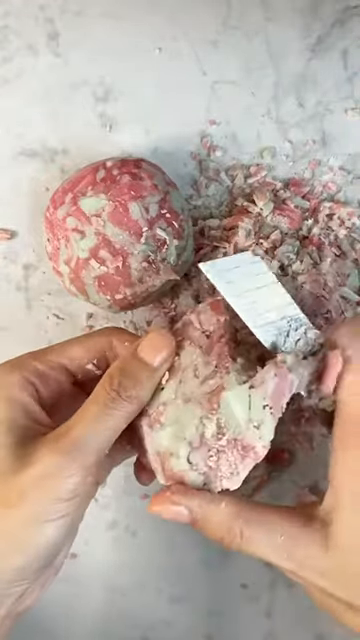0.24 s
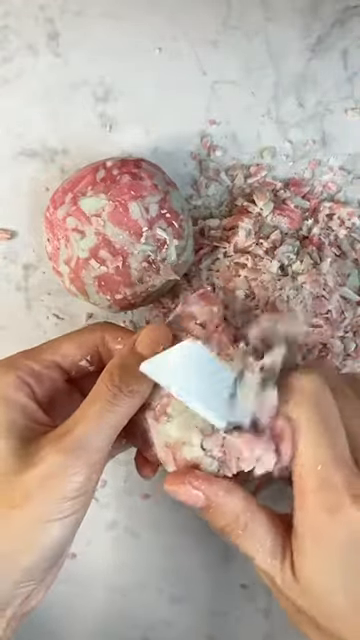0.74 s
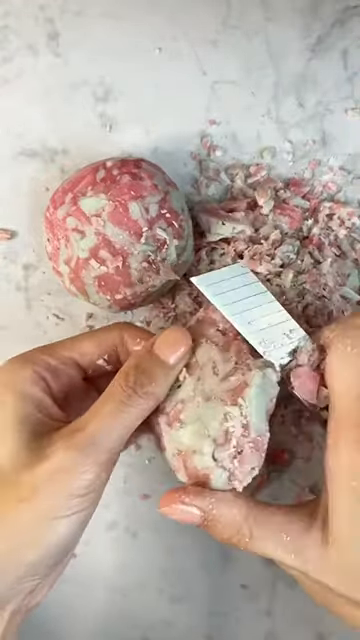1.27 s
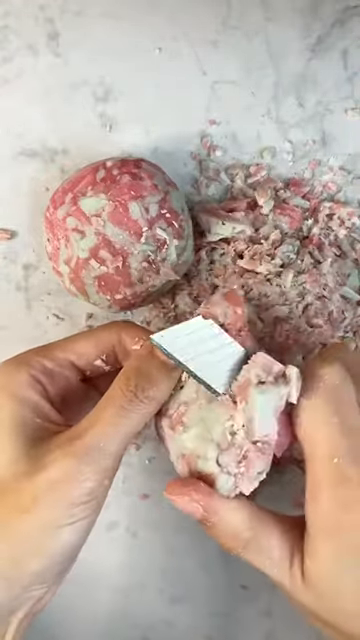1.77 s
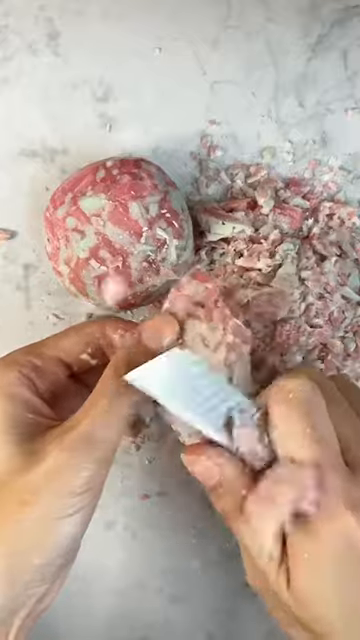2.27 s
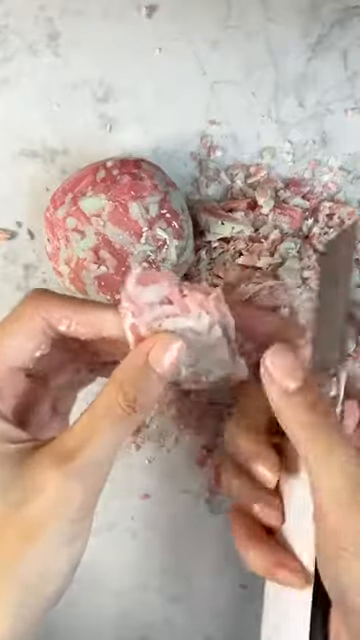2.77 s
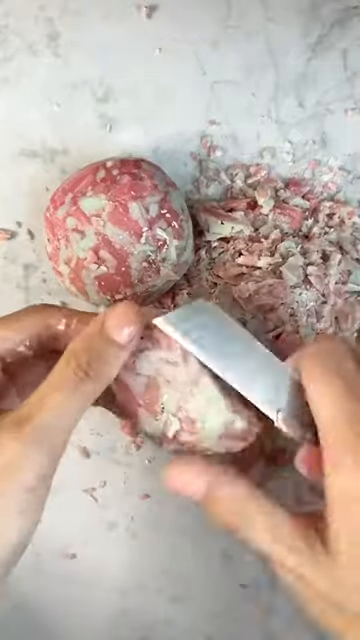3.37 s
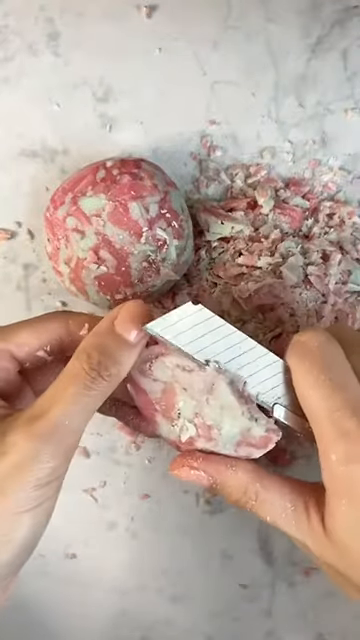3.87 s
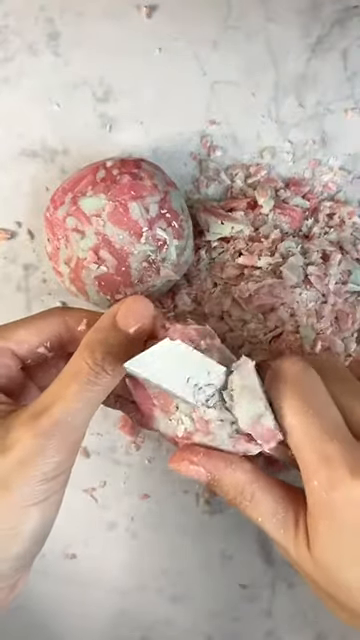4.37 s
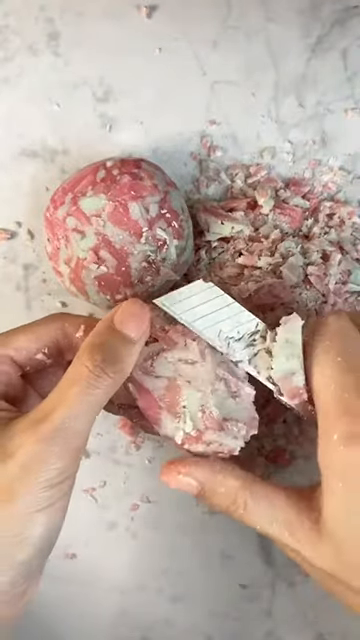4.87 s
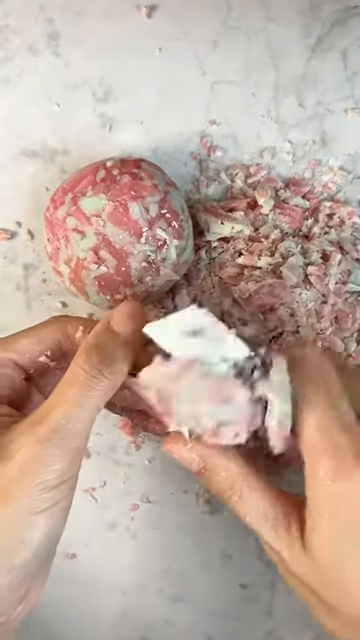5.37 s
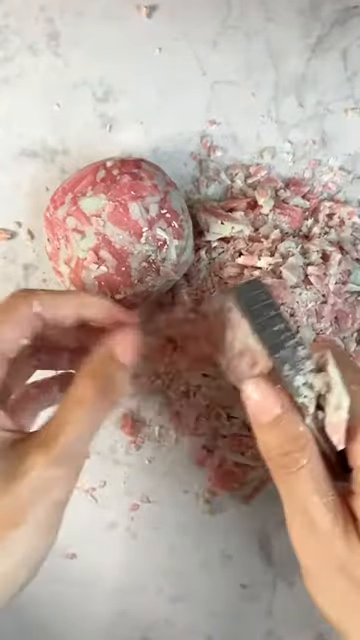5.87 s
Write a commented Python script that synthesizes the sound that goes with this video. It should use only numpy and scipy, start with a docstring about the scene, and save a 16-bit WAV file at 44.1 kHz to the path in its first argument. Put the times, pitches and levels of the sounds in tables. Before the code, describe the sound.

Brittle snaps and dry crunches come in uneven clusters as a blade cuts into hard soap, heard up close in a quiet room. Loosened pieces land on a table top with soft knocks, among tumbling shavings and light scraping. After a brief lull in the middle, a few separate cracks lead into a last flurry of crumbling and falling bits.

```python
"""A thin blade carves a hard, dry ball of soap close to a phone, and the soap cracks in short bursts.
Each crack is a snap and a tear of gritty noise that sets the loosened piece ringing. Chunks knock on
the table top, shavings tumble, the blade rasps and crumbs trickle. The phone's stand sways, too low
in pitch to hear, and a quiet room hums behind."""
import sys
import numpy as np
from scipy import signal
from scipy.fft import rfft, irfft, next_fast_len
from scipy.io import wavfile
from scipy.ndimage import uniform_filter1d, map_coordinates

SR = 44100
rng = np.random.default_rng(int(sys.argv[2]) if len(sys.argv) > 2 else 0)


def transcribe(u):
    """Save the signal u as a 16-bit wav file named by the first command-line argument.

    u: samples, shape (n,) or (channels, n), limited to [-1, 1]; the rate is SR.
    q: integer samples, one column per channel.
    """
    v = np.clip(np.atleast_2d(u).T, -1, 1)
    q = np.round(v * 32767).astype(np.int16)
    wavfile.write(sys.argv[1], SR, q)


N = 270759
t = np.arange(N) / SR

# Cracks in the soap: start_s, relative_level_db, ring_hz, treble_boost_db, tear_length_s
SOAP_CRACKS = [(0.05, -38.5, 2300, -9, 0.022), (0.252, -27.5, 1090, -3.5, 0.025),
               (0.4208, -13.5, 3230, 3.5, 0.0067), (0.4759, -27, 900, 11, 0.005),
               (0.541, -36.5, 1370, 2.5, 0.038), (.606, -31, 2650, 3, 0.0076),
               (0.655, -29.5, 1650, -1.5, 0.021), (0.7191, -19.5, 930, 5, 0.017),
               (.725, -11.5, 2600, 5, 0.0026), (0.749, -23, 2600, -2, 0.02), (0.8738, -35, 1090, 3, 0.03),
               (0.8912, -24.5, 1080, -1.5, 0.0081), (0.9584, -37, 1380, -1, 0.0082),
               (0.9951, -16.5, 1954, -0.5, 0.0027), (1.0037, -20.5, 1170, -13, 0.0061),
               (1.2708, -39, 1900, -9, 0.008), (1.39, -35.5, 1840, 1.5, 0.0015),
               (1.479, -25, 1790, 5, 0.007), (1.498, -33, 2580, 0, 0.0075),
               (1.55, -29.5, 1270, -11, 0.0082), (1.5954, -28.5, 3300, 1, 0.015),
               (1.611, -19.5, 2270, -1, 0.015), (1.9619, -28.5, 1850, -7.5, 0.0083),
               (2.0202, -28, 1300, -7, 0.0039), (2.1006, -10.5, 3500, -0.5, 0.02),
               (2.143, -22.5, 4600, 5.5, 0.0019), (2.238, -25, 2320, -3, 0.0035),
               (2.3229, -9.5, 2850, 5, 0.0023), (2.352, -22.5, 3530, 6, 0.0061),
               (2.39, -13.5, 4500, 8, 0.0033), (2.424, -19.5, 3340, -5, 0.022),
               (2.525, -25, 4820, -1.5, 0.0079), (2.6694, -36, 1840, -3, 0.0056),
               (2.7295, -37, 1750, -23, 0.0066), (2.74, -29, 3060, -8, 0.015),
               (2.7674, -13.5, 2950, 5, 0.0023), (2.917, -37, 990, -10, 0.017),
               (2.948, -35, 1730, -1, 0.0073), (3.3266, -39, 2500, -4.5, 0.0039),
               (3.49, -36, 1930, -10.5, 0.0055), (3.5271, -26, 3500, 2, 0.0042),
               (3.68, -36, 1160, -2.5, 0.02), (4.0634, -20, 4000, 2, 0.016),
               (4.0958, -29.5, 1600, 0, 0.0086), (4.375, -25.5, 3470, -1, 0.007),
               (4.3905, -19.5, 3960, -2.5, 0.018), (4.6136, -18, 4830, 0, 0.0047),
               (4.7668, -33, 1430, 3, 0.0017), (4.905, -31.5, 3590, -11, 0.0024),
               (5.3371, -11.5, 1290, 1.5, 0.012), (5.425, -39, 4760, 17, 0.0026),
               (5.449, -34, 4120, 9, 0.003), (5.554, -34.5, 4040, 4, 0.0076), (5.943, -38, 3000, 0, 0.003),
               (5.473, -23, 3640, -7, 0.014), (5.538, -28, 3440, 0, 0.00081),
               (5.5802, -22, 3480, 10, 0.0023), (5.7503, -31, 1030, 7, 0.0029),
               (5.8606, -21, 3600, 1, 0.0083), (5.8722, -25, 2200, -6.5, 0.028),
               (5.9187, -22, 3040, -3, 0.0041), (5.981, -32.5, 1170, -2.5, 0.0044)]
# Tone colour of the soap lump: frequency_hz, gain_db
LUMP_COLOUR = [(300, -9), (700, -12), (2600, -10.5), (4200, -12.5), (6000, -17), (16000, -53)]
# Tone colour of the brittle edge: frequency_hz, gain_db
EDGE_COLOUR = [(3000, -40.5), (6000, -3.5), (10000, 1), (13000, -3.5), (16500, -16)]
# Tones a loosened piece rings with: multiple_of_ring_pitch, gain_db
PIECE_TONES = [(.65, 0), (1, 10.5), (1.6, 0.5), (2.1, 3)]
# Chunks landing on the table top: start_s, relative_level_db, pitch_hz
CHUNK_LANDINGS = [(0.782, -45, 302), (0.892, -32.5, 383), (1.551, -35, 406), (2.142, -35, 421),
                  (2.319, -35, 610), (2.472, -40, 596), (2.751, -37.5, 315), (2.935, -38, 438),
                  (4.764, -40, 416), (5.462, -33.5, 391), (5.473, -27.5, 410), (5.497, -31, 422),
                  (5.521, -33, 353), (5.586, -43, 347), (5.604, -35.5, 398), (5.723, -40.5, 764),
                  (5.886, -46, 256), (5.922, -28.5, 159)]
# Shavings tumbling and fingers shifting their grip: start_s, level_db, length_s
SHAVING_TUMBLES = [(0.762, -44.5, 0.054), (0.874, -45.5, 0.073), (0.966, -46, 0.12), (1.547, -43.5, 0.024),
                   (1.606, -49.5, 0.05), (2.258, -45, 0.032), (2.332, -52.5, 0.22), (2.752, -40, 0.063),
                   (2.85, -54.5, 0.076), (2.919, -48, 0.087), (3.689, -46, 0.027), (4.763, -54, 0.11),
                   (5.469, -40, 0.073), (5.581, -41, 0.041), (5.648, -53, 0.075), (5.866, -46, 0.11)]
# Tone colour of shavings on the table top: frequency_hz, gain_db
SHAVING_COLOUR = [(40, -66.5), (90, 8.5), (190, 4), (420, 7), (650, 0.5), (1300, -12.5), (4000, -73)]
# Blade strokes and fingers rubbing the lump: start_s, length_s, level_db, treble_boost_db
BLADE_STROKES = [(0.734, 0.066, -58, 4.5), (0.858, 0.21, -60, -9), (1.457, 0.27, -71, -7),
                 (1.903, 0.1, -56, -1.5), (2.084, 0.2, -61.5, -2), (2.312, 0.2, -59, -1.5),
                 (2.72, 0.11, -57.5, -2.5), (2.923, 0.05, -61, -5), (4.043, 0.16, -68, 3),
                 (5.414, 0.12, -64, 6.5), (5.568, 0.15, -69, -0.5), (5.749, 0.067, -66, 8),
                 (5.91, 0.079, -55, -30)]
# How strongly the stand rocks: time_s, relative_level_db
STAND_SWAY = [(0, -16.5), (.25, -31.5), (.7, -31.5), (2.3, -44.5), (4.5, -31.5), (5.5, -33.5),
              (5.75, -19.5), (5.95, -17.5), (6.14, -28)]
# Tone colour of the room's rumble and hiss: frequency_hz, gain_db
ROOM_COLOUR = [(14, -25.5), (24, -9.5), (50, -7), (85, -21), (130, -30), (270, -34.5), (700, -48),
               (2500, -54), (16000, -66)]


def cracks():
    """Each crack builds up, snaps, tears on briefly and stops; the loosened piece rings."""
    lead = SR // 50  # samples of build-up
    body, edge = np.zeros(N + SR), np.zeros(N + SR)
    age = (np.arange(SR // 8) - lead) / SR
    before, after = np.minimum(age - .001, 0), np.maximum(age, 0)
    size = len(age)
    for start_s, level_db, ring_hz, treble_db, tear_s in SOAP_CRACKS:
        tear_s = max(tear_s, .001)
        snap = .55 * np.exp(before / .00087 - after / .00047)
        tear = .5 * np.exp(before / (.13 * tear_s + .00036) - (after / tear_s) ** 3)
        tear *= amp(2.5 * np.repeat(rng.standard_normal(size), SR // 700)[:size])  # flake by flake
        tail = amp(-21) * (age > 0) * np.exp(-after / (tear_s + .007))
        burst = (snap + tear) * grit(size, spread_db=5.5)
        ring = piece_ring(burst, ring_hz, treble_db)
        # Short, dull cracks free thick pieces, which ring more.
        ring_gain = .8 * amp(-.45 * treble_db) / (1 + (tear_s / .008) ** 2)
        # Bright cracks move little mass, so they lose more bass.
        bass = uniform_filter1d(burst, round(SR / ring_hz))
        burst -= bass * np.clip(.6 + .06 * treble_db, 0, 1)
        crunch = .75 * burst + ring_gain * ring + tail * grit(size, spread_db=-.5)
        crackle = (snap + tear + tail) * grit(size, spread_db=8.5)
        at = round(start_s * SR) - lead
        body[at:at + size] += amp(level_db - 9.5) * crunch
        edge[at:at + size] += amp(level_db + treble_db - 14.5) * crackle
    return coloured(body[:N], LUMP_COLOUR) + coloured(edge[:N], EDGE_COLOUR)


def grit(size, spread_db):
    """Noise of tiny fractures: most are weak, a few stand out."""
    strengths = np.minimum(rng.exponential(size=size // 8 + 1), 2.5)
    return unit(amp(spread_db * np.repeat(strengths, 8)[:size]) * rng.standard_normal(size))


def piece_ring(burst, ring_hz, treble_db, ring_cycles=16):
    """A burst shakes a loosened piece, whose tones fade by 60 dB in ring_cycles of the main tone."""
    age = np.arange(SR // 50) / SR
    fade_db = 60 * age * ring_hz / ring_cycles
    ring = np.zeros(len(age))
    for multiple, gain_db in PIECE_TONES:
        dull_db = (multiple != 1) * .5 * min(treble_db, 0)  # dull cracks have weaker side tones
        tone_db = gain_db + rng.normal(0, 2.9) + dull_db
        ring += amp(tone_db - fade_db) * np.sin(2 * np.pi * ring_hz * multiple * age)
    return signal.fftconvolve(burst, ring / np.linalg.norm(ring))[:len(burst)]


def chunk_knocks():
    """A chunk lands softly, rings with a main, a higher and a lower tone, and bounces once."""
    out, age = np.zeros(N + SR), np.arange(SR // 10) / SR
    onset = 1 - np.exp(-age / .00012)
    for start_s, level_db, pitch_hz in CHUNK_LANDINGS:
        landing, bounce = (0, 3.5, .017), (.008, -17, rng.normal(0, .356))
        for delay_s, gain_db, pitch_shift in (landing, bounce):
            phase = 2 * np.pi * pitch_hz * np.exp(pitch_shift) * age
            ring = np.sin(phase) * amp(-60 * age / .05)
            ring += .35 * np.sin(1.55 * phase) * amp(-60 * age / .03)
            ring += .28 * np.sin(.59 * phase) * amp(-60 * age / .16)
            at = round((start_s + delay_s) * SR)
            out[at:at + len(age)] += amp(level_db + gain_db) * ring * onset
    return out[:N]


def tumbling_shavings(bumps_per_s=600):
    """Each tumble is a patter of soft bumps that swells fast, holds and stops."""
    level = np.zeros(N)
    for start_s, level_db, length_s in SHAVING_TUMBLES:
        before, after = np.minimum(t - start_s, 0), np.maximum(t - start_s, 0)
        level += amp(level_db) * np.exp(before / .0044 - (after / length_s) ** 3)
    bumps = (rng.random(N) < bumps_per_s / SR) * rng.standard_normal(N)
    return level * unit(coloured(bumps, SHAVING_COLOUR))


def rasp_and_crumbs(rise_s=.0024, fall_s=.022, trickle_db=-69.5, trickle_treble_db=-71):
    """Crumbs tick over the fine rasp of each stroke and keep trickling between strokes."""
    start_s, length_s, level_db, treble_db = np.transpose(BLADE_STROKES)[..., None]
    before, after = np.minimum(t - start_s, 0), np.maximum(t - start_s - length_s, 0)
    strokes = np.exp(before / rise_s - after / fall_s)
    body_level = amp(trickle_db) + np.sum(amp(level_db) * strokes, axis=0)
    edge_level = amp(trickle_treble_db) + np.sum(amp(level_db + treble_db) * strokes, axis=0)
    crumbs_per_s = 45 + 60 * strokes.max(axis=0)
    crumbs = (rng.random(N) < crumbs_per_s / SR) * amp(4 * rng.standard_normal(N))
    tick_fade = np.exp(-t[:SR // 50] / .0025)
    ticks = 1 + 2.2 * np.convolve(crumbs, tick_fade)[:N]
    clumps = amp(3 * wobble(30)) * ticks
    body = clumps * amp(1.7 * wobble(60)) * coloured(rng.standard_normal(N), LUMP_COLOUR)
    edge = clumps * coloured(rng.standard_normal(N), EDGE_COLOUR)
    # The treble flickers in random patches of pitch and time.
    spectrum = signal.stft(edge, nperseg=256)[2]
    patches = uniform_filter1d(rng.standard_normal(spectrum.shape), size=9, axis=0)
    patches = uniform_filter1d(patches, size=14, axis=1)
    edge = signal.istft(spectrum * amp(3.8 * unit(patches)), nperseg=256)[1][:N]
    return body_level * unit(body) + edge_level * unit(edge)


def swaying_stand(rock_hz=12.5):
    """The phone's stand rocks and drifts; a shove is still settling at the start."""
    sway_db = np.interp(t, *np.transpose(STAND_SWAY))
    cycles = np.cumsum(rock_hz + 2 * wobble(2.5)) / SR
    rocking = amp(sway_db + 1) * np.cos(2 * np.pi * cycles)
    drift = coloured(rng.standard_normal(N), [(1, -13.5), (7, .5), (11, -14), (30, -51), (100, -120)])
    shove = .22 * np.exp(-t / .21)
    return rocking + amp(-40.5) * unit(drift) + shove


def room(low_hz=48, hum_hz=121, hum_start_s=4.77):
    """The room's rumble and hiss, a constant low tone and a hum that switches on late."""
    air = amp(-46.5) * unit(coloured(rng.standard_normal(N), ROOM_COLOUR))
    low_tone = amp(-49.5 + wobble(4.5)) * np.sin(2 * np.pi * low_hz * t)
    switch_on = np.clip((t - hum_start_s) / .04, 0, 1)
    hum = amp(-57 + 1.5 * wobble(5)) * switch_on * np.sin(2 * np.pi * hum_hz * t)
    return air + low_tone + hum


def amp(db):
    """Turn decibels into a number to multiply by."""
    return 10 ** (np.asarray(db) / 20)


def unit(x):
    """Scale a sound to an average power of one."""
    return x / np.sqrt(np.mean(x ** 2) + 1e-20)


def wobble(points_per_s):
    """A smooth curve through random points."""
    return map_coordinates(rng.standard_normal(int(N * 400 / SR) + 4), [t * points_per_s])


def coloured(x, colour):
    """Filter a sound to a (frequency_hz, gain_db) shape; white noise keeps its power."""
    size = next_fast_len(N + SR)
    hz, db = np.transpose(colour)
    gain_db = np.interp(np.log(np.fft.rfftfreq(size, 1 / SR) + 1), np.log(hz + 1), db)
    # Folding onto the first half makes the filter ring only after a hit, never before it.
    folded = irfft(np.log(amp(gain_db)), size)
    folded[1:size // 2] *= 2
    folded[size // 2 + 1:] = 0
    response = np.exp(rfft(folded))
    response /= np.sqrt(np.mean(np.abs(response) ** 2))
    return irfft(rfft(x, size) * response, size)[:N]


def scene():
    """Add the soap, the stand and the room into one channel."""
    soap = cracks() + chunk_knocks() + tumbling_shavings() + rasp_and_crumbs()
    return (soap + swaying_stand() + room())[None]


def record(dry):
    """The phone cuts off the very highest treble."""
    top_hz = 16300
    return signal.sosfiltfilt(signal.ellip(10, .1, 60, top_hz, fs=SR, output="sos"), dry)


dry = scene()
out = record(dry)
transcribe(out)
```